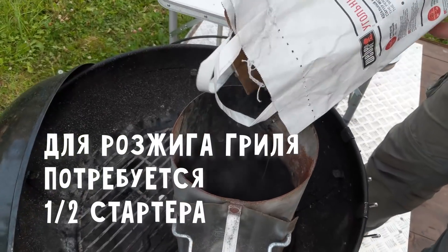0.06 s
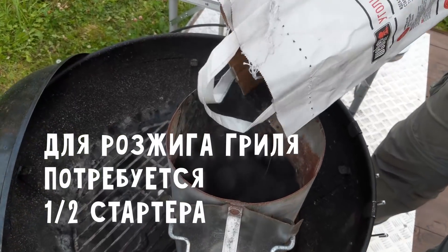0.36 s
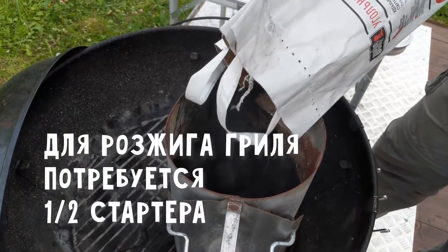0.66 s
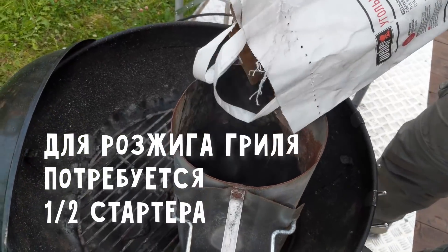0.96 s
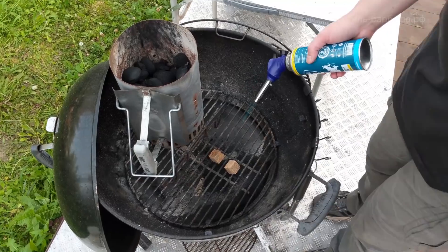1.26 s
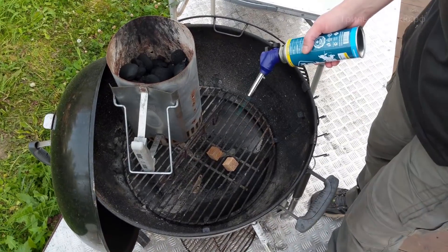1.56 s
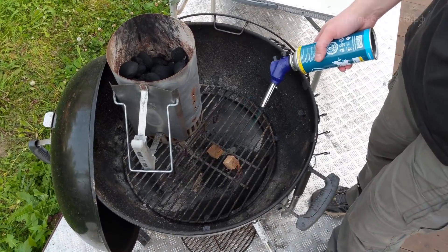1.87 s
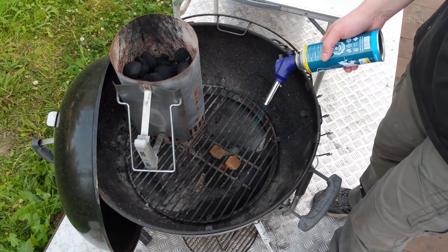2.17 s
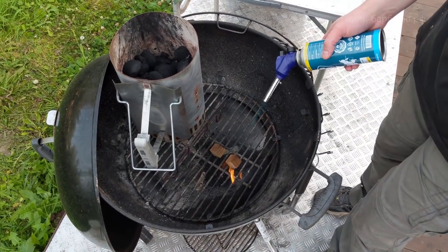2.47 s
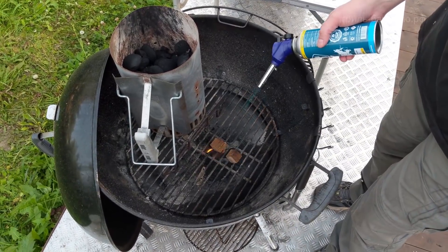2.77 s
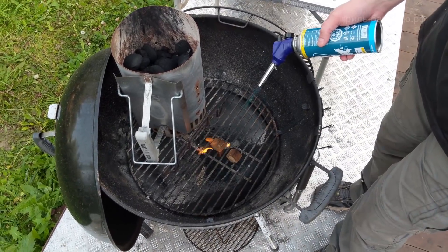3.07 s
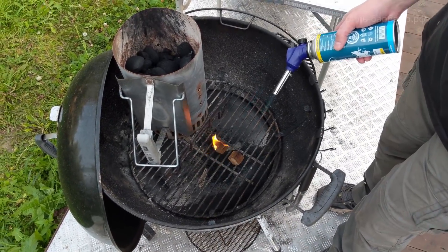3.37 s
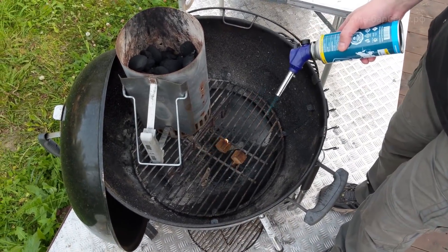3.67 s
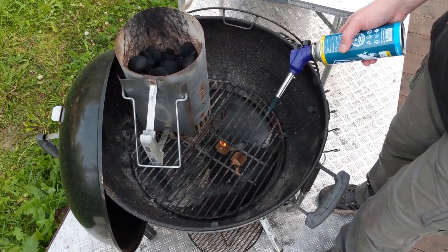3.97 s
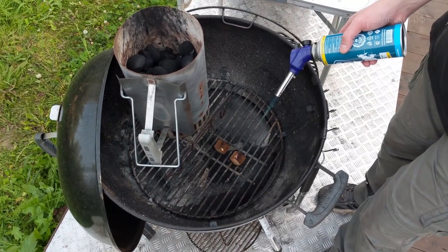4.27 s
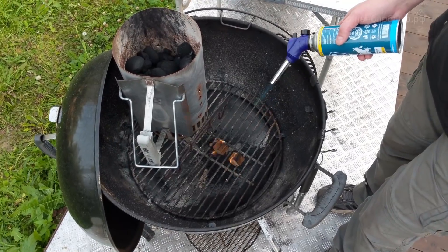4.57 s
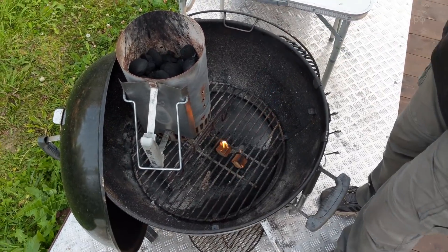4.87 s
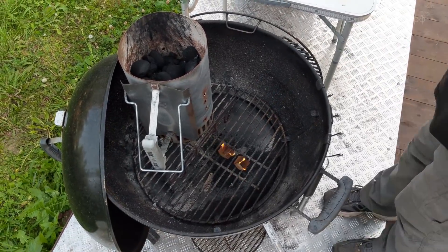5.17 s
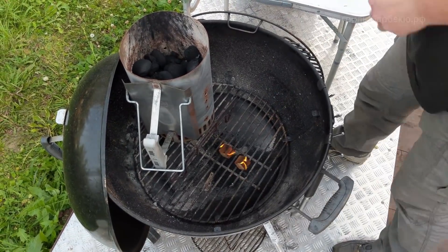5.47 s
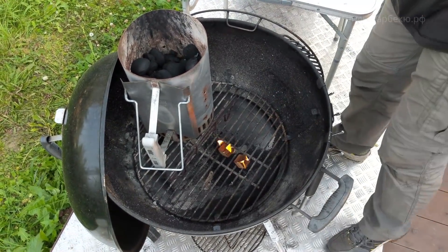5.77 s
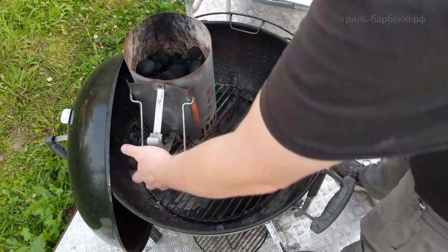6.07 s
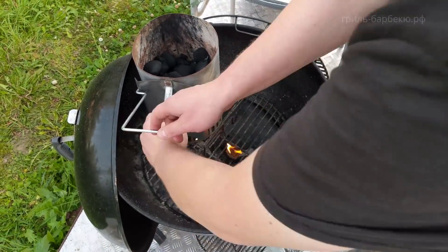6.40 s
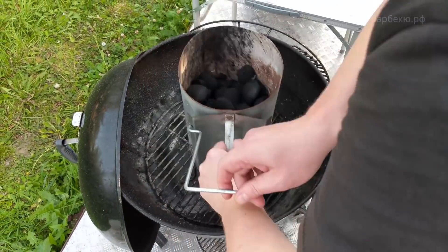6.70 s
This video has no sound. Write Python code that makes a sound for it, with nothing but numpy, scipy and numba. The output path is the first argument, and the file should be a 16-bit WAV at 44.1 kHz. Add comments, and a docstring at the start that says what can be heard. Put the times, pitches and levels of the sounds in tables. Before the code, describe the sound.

For the first second, charcoal briquettes slide out of a paper bag in crackling surges, thumping and clinking into a steel chimney starter that rings faintly. At about 1.1 seconds a gas torch takes over, with a steady, hollow flame roar and a wavering hiss whose tone shifts slightly as the nozzle moves. Around 4.8 seconds the flame flares briefly, then weakens and sputters, cutting off at about 5.2 seconds. Small valve ticks fall between 5 and 5.6 seconds. At 5.7 seconds the torch's gas can is set down with a sharp metallic knock, the loudest hit, and quickly rattles to rest. From about 6.1 to 6.7 seconds the chimney's wire handle clicks, scrapes against rusty steel and gives a few tiny, high squeaks. All the sounds are close, within arm's reach, outdoors in very still air with almost no background noise.

```python
"""Outdoors, charcoal briquettes slide from a paper bag, thumping and clinking into a steel chimney
starter on a kettle grill. A gas torch then plays on the firelighters: its flame roars in the burner
tube, its jet hisses. It flares as it is pulled away, sputters and is shut off with small valve ticks.
The torch is set down with a knock and rocks to rest. Last, the chimney's wire handle clicks,
scrapes in its holes and squeaks as it sticks and slips."""
import sys
import numpy as np
from scipy import signal
from scipy.fft import rfft, irfft
from scipy.io import wavfile
from scipy.ndimage import uniform_filter1d
from numba import njit

SR = 44100
rng = np.random.default_rng(int(sys.argv[2]) if len(sys.argv) > 2 else 0)


def log_audio(samples):
    """Write samples as a 16-bit WAV file to the path given in sys.argv[1]."""
    # one column per channel
    frames = np.atleast_2d(samples).T
    # limit to full scale, then quantise
    limited = np.clip(frames, -1, 1)
    pcm = np.round(limited * 32767).astype(np.int16)
    wavfile.write(sys.argv[1], SR, pcm)


N = 297234
TIME = np.arange(N) / SR
AGE = TIME[:SR // 2]  # s since a hit
TOP_HZ = 15800


def amp(db):
    """Decibels to gain."""
    return 10 ** (np.asarray(db) / 20)


def unit(x):
    """Scale to rms 1."""
    return x / np.sqrt(np.mean(x ** 2))


def hit_level(x, db):
    """Scale a hit to the energy of that level held for 10 ms."""
    return x * amp(db) / np.sqrt(np.sum(x ** 2) / (SR / 100))


def fade(t60_s):
    """Exponential decay of a hit."""
    return np.exp(-np.log(1000) * AGE / t60_s)


def hold(start_s, rise_s, end_s, t60_s):
    """Gaussian rise up to the start, steady level, exponential fall after the end."""
    rise = (np.minimum(TIME - start_s, 0) / rise_s) ** 2
    fall = np.log(1000) * np.maximum(TIME - end_s, 0) / t60_s
    return np.exp(-rise - fall)


def swell(peak_s, rise_s, t60_s):
    """Gaussian rise to a peak, exponential fall after it."""
    return hold(peak_s, rise_s, peak_s, t60_s)


def add(out, s, x):
    """Mix x in at time s."""
    i = max(int(s * SR), 0)
    out[i:i + len(x)] += x[:N - i]


def walk(rate_hz):
    """Smooth random motion, rms 1."""
    span = max(int(SR / rate_hz), 1)
    steps = rng.standard_normal(N // 16)[np.arange(N) // max(span, 16)]
    return unit(uniform_filter1d(uniform_filter1d(steps, span), span))


def grains(size, spread_db):
    """Noise in tiny grains, a few much stronger than the rest."""
    strength = np.repeat(np.minimum(rng.exponential(size=size // 16 + 1), 5), 16)[:size]
    return unit(rng.standard_normal(size) * amp(spread_db * strength))


def colour(x, points):
    """Minimum-phase filter through points of f/Hz, gain/dB."""
    hz, db = np.transpose(points)
    log_freqs = np.log(np.fft.rfftfreq(4096, 1 / SR) + 1)
    log_gain = np.log(amp(np.interp(log_freqs, np.log(hz), db)))
    cepstrum = irfft(log_gain) * np.r_[1, np.full(2047, 2), 1, np.zeros(2047)]
    impulse = irfft(np.exp(rfft(cepstrum)))
    return signal.fftconvolve(x, impulse)[:len(x)]


def highpass(x, hz, order):
    """Butterworth high-pass."""
    return signal.sosfilt(signal.butter(order, hz, "high", fs=SR, output="sos"), x)


@njit
def svf(x, hz, width_hz):
    """State-variable band-pass, one centre frequency per sample."""
    y, band_state, low_state = np.empty(len(x)), 0., 0.
    for i in range(len(x)):
        gain, damping = np.tan(np.pi * hz[i] / SR), width_hz / hz[i]
        passed = (band_state + gain * (x[i] + 1e-18 - low_state)) / (1 + gain * (gain + damping))
        band_state = 2 * passed - band_state
        low_state += 2 * gain * passed
        y[i] = damping * passed
    return y


def band(x, hz, width_hz):
    """One resonance, gain 1 at its steady or moving centre."""
    return svf(x, np.minimum(hz + np.zeros(len(x)), .45 * SR), float(width_hz))


def ring(modes, scatter_db, detune):
    """Struck modes (f/Hz, level/dB, t60/s); each point of contact weights them anew."""
    draws = rng.standard_normal((len(modes), 3))
    return sum(np.sign(polarity) * amp(db + scatter_db * weight) * fade(t60_s)
               * np.sin(2 * np.pi * hz * (1 + detune * shift) * AGE)
               for (hz, db, t60_s), (weight, shift, polarity) in zip(modes, draws))


def burst(t60_s, tail_db, tail_t60_s):
    """A rough contact and its scattered reflections."""
    return grains(len(AGE), spread_db=-1) * (fade(t60_s) + amp(tail_db) * fade(tail_t60_s))


def click(db, hz, t60_s):
    """A crack focused around one pitch, with a faint broadband part."""
    crack = burst(t60_s, -31.5, .097)
    focused = band(band(crack, hz, hz), hz, .5 * hz)
    broad = band(band(crack, 3500, 9000), 3500, 9000)
    return hit_level(focused + amp(-17.5) * broad, db)


def metal_clicks(rows, modes):
    """Short clicks with a bright overtone, each ringing a metal body."""
    out = np.zeros(N)
    for s, db, hz, t60_s in rows:
        ringing = hit_level(ring(modes, scatter_db=-2, detune=.0044) * fade(t60_s), db - 6.5)
        add(out, s, click(db, hz, t60_s) + click(db - 6, 4.15 * hz, t60_s) + ringing)
    return out


def still_air():
    """Very faint outdoor noise, strongest in the bass."""
    spectrum = [(50, 12), (500, -5), (3000, -5), (16000, -22)]
    return amp(-93.5) * unit(colour(rng.standard_normal(N), spectrum))


# wire handle modes: f/Hz, level/dB, t60/s
WIRE_MODES = [(1904, 1.5, 0.043), (3514, -1, 0.062), (4860, -2, 0.04), (7100, 4.5, .03), (8800, -1.5, .04),
              (9400, 0, .04), (10960, 3, .03), (12180, -5, 0.032)]
def wire(friction, ring_db):
    """Friction plus the ring it draws from the wire."""
    ringing = signal.fftconvolve(friction, ring(WIRE_MODES, scatter_db=1, detune=0))[:len(friction)]
    return friction + amp(ring_db) * np.std(friction) * unit(ringing)


# handle clicks: t/s, level/dB, f/Hz, t60/s
HANDLE_CLICKS = [(6.11, -35, 2800, 0.021), (6.131, -45, 5500, .012), (6.493, -38.5, 700, .06),
                 (6.713, -66.5, 9550, .025)]
def handle_clicks():
    """The handle clicks and its wire rings."""
    return metal_clicks(HANDLE_CLICKS, WIRE_MODES)


# handle strokes: peak t/s, level/dB, rise/s, t60/s, catch level/dB
SCRAPES = [(6.146, -41, 0.026, 0.26, -54), (6.175, -46.5, 0.013, 0.17, -45),
           (6.369, -57.5, 0.0059, 0.24, -58), (6.407, -51, 0.0074, 0.19, -48),
           (6.434, -48, 0.0047, 0.33, -40), (6.496, -41.5, 0.006, 0.21, -38),
           (6.518, -39, 0.011, 0.11, -46), (6.594, -45, 0.009, 0.12, -40)]
# friction spectrum: f/Hz, gain/dB
SCRAPE_SPECTRUM = [(59, -61), (120, -29), (300, -8), (600, -3), (1100, -17.5), (1830, -7.5), (2520, -7),
                   (4200, -11), (5420, -12), (9020, -12), (15000, -13.5)]
def handle_scrapes():
    """Wire catches and drags over rusty steel, rubbing lightly while the hand holds it."""
    grip = amp(-68) * hold(start_s=6.06, rise_s=.0078, end_s=6.64, t60_s=.46)
    stroke_power = sum((amp(db) * swell(s, rise_s, t60_s)) ** 2 for s, db, rise_s, t60_s, _ in SCRAPES)
    pressure = np.sqrt(grip ** 2 + stroke_power)
    rub = colour(grains(N, spread_db=2.6) * amp(2.3 * walk(170)), SCRAPE_SPECTRUM)
    out = pressure * unit(highpass(rub, 150, order=2))  # thin wire radiates little bass
    catch_onset = 1 - np.exp(-AGE / .0011)
    for s, *_, catch_db in SCRAPES:
        add(out, s - .004, catch_onset * click(catch_db, hz=7800, t60_s=.038))
    return wire(out, ring_db=-9)


# squeaks: peak t/s, level/dB, half length/s, f/Hz, bend/octaves
SQUEAKS = [(6.2572, -31.5, 0.0049, 1759, .04), (6.599, -36.5, 0.007, 1786, -.01),
           (6.625, -38.5, 0.006, 1570, -.01)]
# squeak harmonics 1-8: level/dB
HARMONICS_DB = [2.5, -6.5, -6.5, 2.5, 2.5, -5, -0.5, -7]
def handle_squeaks():
    """Stick-slip locks onto a bending pitch, clear at the bottom, rough in its overtones."""
    jitter_rad = .44
    out = np.zeros(N)
    for s, db, half_length_s, hz, bend_octaves in SQUEAKS:
        near = np.abs(TIME - s) < .08
        along = (TIME[near] - s) / half_length_s
        cycles = np.cumsum(hz * 2 ** (bend_octaves * np.tanh(along / 2))) / SR
        tone = 0
        for k, harmonic_db in enumerate(HARMONICS_DB, 1):
            phase = 2 * np.pi * (k * cycles + rng.random()) + k * jitter_rad * walk(700)[near]
            tone += amp(harmonic_db) * np.sin(phase)
        out[near] += hit_level(wire(unit(tone) / np.cosh(along), ring_db=-9.5), db)
    return out


# burner modes: f/Hz, level/dB, t60/s
BURNER_MODES = [(2900, 0.5, .04), (3450, -7, 0.055), (4355, 0.5, 0.061), (7050, -5, 0.027),
                (9600, 0, 0.034), (10600, -4.5, 0.055)]
def burner_rattle(db):
    """The loose burner chatters on the gas can."""
    spectrum = [(800, -28), (2100, .5), (2800, 5.5), (4900, .5), (7500, -6.5), (10500, 2.5), (16000, 0)]
    chatter = unit(colour(burst(.016, -4, .11), spectrum))
    ringing = unit(ring(BURNER_MODES, scatter_db=3, detune=.0043))
    return hit_level(chatter + amp(-5.5) * ringing, db)


# valve and can ticks: t/s, level/dB, f/Hz, t60/s
VALVE_TICKS = [(5.047, -42, 4060, 0.0085), (5.415, -50.5, 3095, 0.02), (5.5, -68.5, 400, 0.08),
               (5.501, -71, 2500, .03), (5.544, -62.5, 4950, 0.03), (5.564, -59, 3270, 0.032)]
def valve_ticks():
    """Small clicks of valve and can ring the burner."""
    return metal_clicks(VALVE_TICKS, BURNER_MODES)


# gas can modes: f/Hz, level/dB, t60/s
CAN_MODES = [(316, -8.5, 0.08), (460, 0, 0.04), (556, -2.5, .085), (630, -1.5, 0.07), (960, -4, 0.02),
             (1130, 2.5, 0.028), (1348, -1.5, 0.06), (1505, -13, 0.15), (1737, -8, 0.05),
             (2790, -8.5, 0.04), (4400, -19, 0.054)]
# crack of the can's shell: f/Hz, gain/dB
SHELL_SPECTRUM = [(200, -18.5), (680, 2.5), (900, -6), (1200, -0.5), (1680, -4), (2050, -12), (2800, -9),
                  (3310, -17.5), (5230, -18), (7270, -28.5), (16000, -28)]
def can_knock(db):
    """The gas can meets a hard top; its shell cracks and rings."""
    ringing = unit(ring(CAN_MODES, scatter_db=1, detune=.008))
    crack = unit(colour(burst(.02, -7, .074), SHELL_SPECTRUM))
    return hit_level(ringing + amp(-2) * crack, db)


# contacts of the rocking can: t/s, knock level/dB, rattle level/dB
KNOCKS = [(5.7011, -15, -28), (5.7062, -22, -31), (5.7192, -25.5, -38), (5.7232, -33, -31),
          (5.729, -31, -28.5), (5.745, -33.5, -40), (5.758, -38.5, -48), (5.779, -52, -51.5),
          (5.797, -58, -65)]
def torch_set_down():
    """The can lands on its rim and rocks to rest, which damps its ring."""
    out = np.zeros(N)
    add(out, KNOCKS[0][0], click(db=-27, hz=4540, t60_s=.006))
    for s, knock_db, rattle_db in KNOCKS:
        add(out, s, can_knock(knock_db) + burner_rattle(rattle_db))
    damping = hold(start_s=0, rise_s=1, end_s=5.81, t60_s=.12)
    return highpass(out * damping, 300, order=3)  # a small can radiates little bass


def crush():
    """Soft 1 ms onset of a crumbling contact."""
    return 1 - np.exp(-AGE / .001)


def clink(db, hz):
    """Two briquettes crack together; small, high-pitched chips ring less clearly."""
    whole_hz, ring_db_per_octave = 3000, -9.5
    crack = unit(band(burst(.02, 3.3, .19), .93 * hz, .69 * hz))
    modes = [(hz, 0, .04), (1.09 * hz, -5, .03), (1.5 * hz, -11, .025)]
    tone = unit(ring(modes, scatter_db=3.5, detune=.011))
    tone_db = ring_db_per_octave * np.log2(hz / whole_hz)
    return hit_level(crush() * (amp(tone_db) * tone + crack), db)


# modes of the chimney with coal in it: f/Hz, level/dB, t60/s
CHIMNEY_MODES = [(177, -11.5, 0.11), (260, -3.5, 0.041), (337.3, -2.5, 0.1), (471.3, 10.5, 0.043),
                 (717, 4.5, 0.059), (1073, -5.5, 0.2), (1392, -3.5, 0.12), (1700, -8.5, 0.099),
                 (2180, -16, 0.045)]
def lump(thump_db, knock_db, grit_db, hz):
    """One lump thumps the yielding coal bed, knocks the chimney and sheds grit."""
    steel = unit(ring(CHIMNEY_MODES, scatter_db=3, detune=.02))
    contact = unit(band(burst(.02, -11.5, .25), 760, 2500))
    body = crush() * (steel + contact)
    bed = crush() * unit(ring([(hz, 0, .045), (.65 * hz, -7, .035)], scatter_db=3.5, detune=.034))
    thump = band(body + amp(-5) * bed, hz, 1.27 * hz)
    knock = band(band(body, 1300, 1900), 1400, 2800)
    grit_spectrum = [(600, -17.5), (2800, 8.5), (5000, 7.5), (9500, 2), (15000, -17)]
    grit = colour(crush() * burst(.063, 1.5, .24), grit_spectrum)
    return hit_level(thump, thump_db) + hit_level(knock, knock_db) + hit_level(grit, grit_db)


# shakes of the bag: peak t/s, level/dB
SHAKES = [(.01, -35), (.18, -38), (.37, -34), (.52, -39.5), (.74, -32.5), (.87, -32.5), (1.02, -38)]
# coal sliding on paper: f/Hz, gain/dB
SLIDE_SPECTRUM = [(29, -52), (50, -15.5), (291, 0), (461, -6.5), (690, -1), (884, -3.5), (1330, -3),
                  (1580, -8.5), (3030, -2.5), (3500, -6), (9410, -10.5), (16000, -24)]
def bag_slide(end_s):
    """Each shake sends a crackling surge of coal over the paper."""
    surges = np.sqrt(sum((amp(db) * swell(s, rise_s=.04, t60_s=.75)) ** 2 for s, db in SHAKES))
    flow = surges * hold(start_s=0, rise_s=.04, end_s=end_s, t60_s=.05)
    crackle = grains(N, spread_db=1.75) * amp(2.5 * walk(89.18))
    return flow * unit(colour(crackle, SLIDE_SPECTRUM))


# chimney wall resonances: f/Hz, width/Hz, gain/dB
WALL_RESONANCES = [(170, 25, -9), (2980, 110, -10), (3870, 25, 0), (6560, 22, 0), (8750, 200, -6),
                   (9500, 70, -1)]
def chimney_wall(coal):
    """The thin wall sings along, its tones varying with where the coal strikes."""
    return sum(amp(db + 4 * walk(12)) * band(coal, hz, width_hz) for hz, width_hz, db in WALL_RESONANCES)


# briquette landings: t/s, thump level/dB, knock level/dB, grit level/dB, thump f/Hz
LANDINGS = [(.003, -33.5, -38, -40, 610), (.036, -36.5, -39, -39.5, 484), (.133, -26.5, -24.5, -28.5, 560),
            (.317, -22, -31, -34, 440), (.427, -36, -37.5, -37, 410), (.506, -31.5, -33, -40, 464),
            (0.602, -45, -38.5, -45, 470), (.677, -20.5, -32.5, -29, 426), (.689, -21.5, -32.5, -30, 267),
            (.712, -24.5, -36.5, -33, 440), (.859, -34.5, -31.5, -34, 414),
            (0.917, -39.5, -34.5, -38.5, 503), (.96, -29.5, -32.5, -40, 455),
            (.989, -47, -30.5, -30.5, 600)]
# briquette clinks: t/s, level/dB, f/Hz
CLINKS = [(.059, -34.5, 3100), (.081, -25.5, 2770), (.1, -27.5, 3000), (0.109, -29, 3050),
          (.168, -35.5, 6700), (0.235, -35, 4170), (0.289, -33, 2920), (.293, -28.5, 5570),
          (0.468, -38, 2860), (.603, -40.5, 2800), (0.656, -26.5, 5150), (0.686, -24.5, 8900),
          (0.96, -33, 6950), (.988, -32.5, 3110), (1.059, -37, 2370)]
def charcoal():
    """Lumps slide, land and clink; the bed settles in two bumps, stronger after a deeper thump."""
    pour_end_s, bed_hz, settle_gap_s = 1.052, 205.5, .022
    out = bag_slide(pour_end_s)
    for s, thump_db, knock_db, grit_db, hz in LANDINGS:
        add(out, s, lump(thump_db, knock_db, grit_db, hz))
        settle_db = thump_db - 12.5 * np.log2(hz / bed_hz)
        for k in (1, 2):
            bump = lump(settle_db - 4 * (k - 1), knock_db - 10.5 * k, grit_db - 10.5 * k, bed_hz)
            add(out, s + k * settle_gap_s, bump)
    for s, db, hz in CLINKS:
        add(out, s, clink(db, hz))
    for when, strength, pitch in rng.uniform(-1, 1, size=(12, 3)):
        chip = clink(db=-45.5 + 3 * strength, hz=4340 * 2 ** (.6 * pitch))
        add(out, pour_end_s * (when + 1) / 2, chip)
    return highpass(out + chimney_wall(out), 130, order=1)  # the open chimney holds no deep bass


# nozzle swings: t/s, new aim (0 = one firelighter, 1 = the other)
SWINGS = [(1.95, .75), (2.62, .1), (3.4, 1), (4.8, .4)]
def nozzle_aim(swing_s=.17):
    """The hand dwells on one firelighter, then swings towards the other."""
    aim = np.zeros(N)
    for s, target in SWINGS:
        aim[TIME >= s] = target
    return uniform_filter1d(aim, int(swing_s * SR))


def jet_waver(hiss, spacing_hz=280):
    """The wavering jet makes narrow bands of its hiss swell and fade, most in the treble."""
    spectrum, freqs, out = rfft(hiss), np.fft.rfftfreq(N, 1 / SR), 0
    for hz in np.arange(0, TOP_HZ, spacing_hz):
        triangle = np.maximum(1 - np.abs(freqs - hz) / spacing_hz, 0)
        depth_db = 4 * min(hz / 7500, 1)
        out += irfft(spectrum * triangle, N) * unit(amp(depth_db * walk(8)))
    return out


# gas jet hiss: f/Hz, gain/dB
JET_SPECTRUM = [(300, -29), (900, -1), (1400, 5), (2000, 2), (3000, -3.5), (3800, -6), (5000, -7),
                (7000, -11), (8800, -18), (10500, -12), (14000, -18), (16000, -12.5)]
# standing waves: f/Hz, width/Hz, gain at aim 0/dB, gain at aim 1/dB
STANDING_WAVES = [(1400, 250, 3.5, -1), (1650, 200, -7, -.5), (1950, 300, 1.5, 5.5), (2330, 200, -5, -3),
                  (2600, 250, 5.5, 3), (3000, 220, -4, -1), (3780, 280, 8.5, 3), (4230, 400, -1, -14),
                  (4720, 400, 1.5, 8.5), (6750, 400, 2, 8), (7250, 400, 5, -2.5), (7750, 250, -4, -9),
                  (8100, 300, 0, 10.5), (9250, 600, 1.5, -5), (11400, 600, 0, 3), (12400, 700, -5, -2),
                  (13150, 500, 6, 3)]
def gas_jet():
    """Hiss stands between nozzle, grate and bowl and shifts with the hand: hollow and phasey."""
    jet = colour(grains(N, spread_db=1.5), JET_SPECTRUM)
    aim = nozzle_aim()
    notch_hz = (6020 - 120 * aim) * (1 + .014 * walk(6))
    for _ in range(2):
        jet = jet - .68 * band(jet, notch_hz, 1350)
    for hz, width_hz, first_db, second_db in STANDING_WAVES:
        db = first_db + aim * (second_db - first_db)
        centre_hz = hz * (1 + .01 * walk(2.5))
        for _ in range(2):
            jet = jet + (amp(db / 2) - 1) * band(jet, centre_hz, width_hz)
    # the narrow orifice sings faintly
    whistle = band(band(rng.standard_normal(N), 15600 - 450 * aim, 4200), 15040, 2400)
    return jet_waver(unit(jet) + amp(-11.5 + walk(4)) * unit(whistle))


# flare: f/Hz, gain/dB
FLARE_SPECTRUM = [(120, -64), (200, -31), (623, 1.5), (806, -20), (1300, -21), (1500, -1.5), (1680, -14),
                  (1980, -3), (2650, -11), (3430, -10.5), (6050, -20.5), (14100, -25.5), (16000, -36)]
def flare():
    """The flame flares briefly as the torch is pulled away."""
    envelope = amp(-29) * swell(peak_s=4.815, rise_s=.024, t60_s=.19)
    return envelope * unit(colour(grains(N, spread_db=2.5), FLARE_SPECTRUM))


# starved flame: f/Hz, gain/dB
STARVED_SPECTRUM = [(100, -39), (250, -13), (500, 4), (950, 7.5), (1400, 2), (2200, -21.5), (4000, -34.5)]
def starved_flame():
    """Short of gas, the flame loses its resonance and sputters."""
    envelope = amp(-42.5) * swell(peak_s=5.01, rise_s=.16, t60_s=2)
    return envelope * unit(colour(grains(N, spread_db=2), STARVED_SPECTRUM))


# flame in the burner tube: f/Hz, gain/dB
ROAR_SPECTRUM = [(60, -45), (130, -48), (220, -24.5), (350, -16.5), (480, -8.5), (600, 0.5), (760, 3.5),
                 (950, -10.5), (1200, -22.5), (2000, -39), (4000, -66)]
def flame_roar(flutter_db):
    """Turbulence drives the tube's resonance, which saturates: slow swells shrink, flutter stays."""
    window_s, steadiness = .11, .6
    roar = colour(rng.standard_normal(N), ROAR_SPECTRUM) * amp(flutter_db)
    rms = np.sqrt(uniform_filter1d(roar ** 2, int(window_s * SR)))
    roar = unit(roar / rms ** steadiness)
    # the flame tip buffets the grate, so the lowest part comes and goes
    return roar + (amp(2 * walk(9)) - 1) * band(roar, 290, 112)


def torch():
    """The roar builds from cold over the steadier hiss of the jet; both die as the valve closes."""
    on_s, rise_s, closing_s, off_s = 1.064, .051, 4.688, 5.2
    gas = hold(on_s, rise_s, off_s, t60_s=.064)
    cold = np.exp(-np.maximum(TIME - on_s, 0) / .11)
    burn = amp(-34.5 - 5 * cold) * hold(on_s, rise_s, closing_s, t60_s=.8)
    flutter_db = 1.2 * walk(45)
    roar = burn * flame_roar(flutter_db)
    hiss = amp(-46 + .17 * (TIME - on_s) + .56 * flutter_db) * gas_jet()
    return gas * (roar + hiss + flare() + starved_flame())


def scene():
    """All sources within arm's reach, in very still air; mono."""
    mix = charcoal() + torch() + torch_set_down() + valve_ticks()
    handle = handle_clicks() + handle_scrapes() + handle_squeaks()
    return (mix + handle + still_air())[None]


def record(dry):
    """The microphone loses the deepest bass and the very top."""
    lowpass = signal.ellip(10, .2, 80, TOP_HZ, fs=SR, output="sos")
    return signal.sosfilt(lowpass, highpass(dry, 55, order=2))


dry = scene()
out = record(dry)
log_audio(out)
```